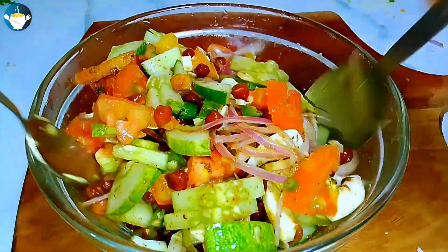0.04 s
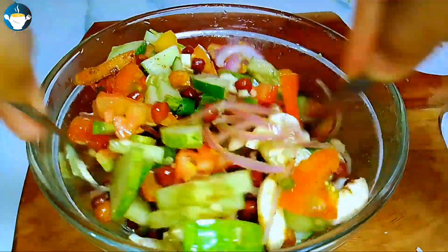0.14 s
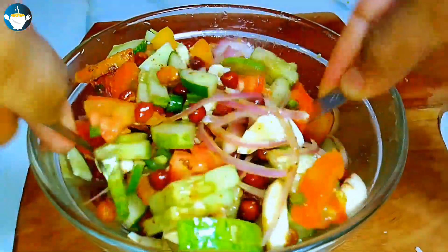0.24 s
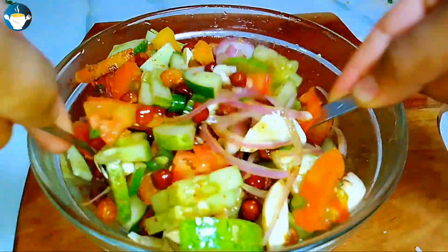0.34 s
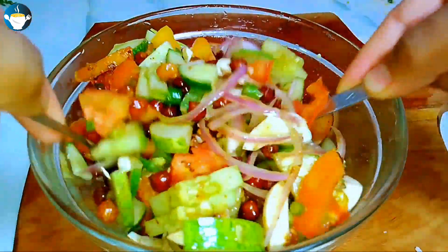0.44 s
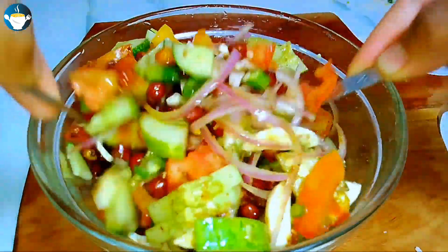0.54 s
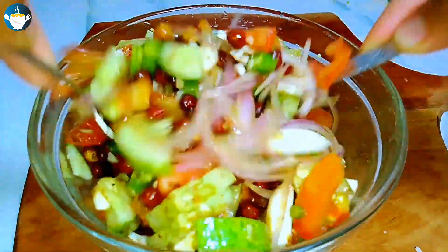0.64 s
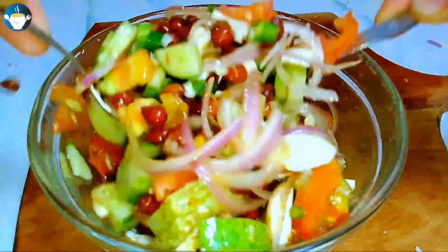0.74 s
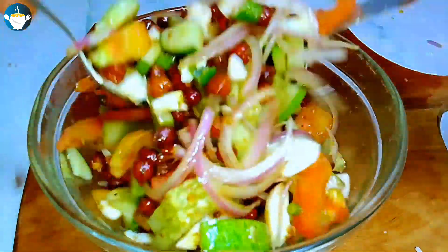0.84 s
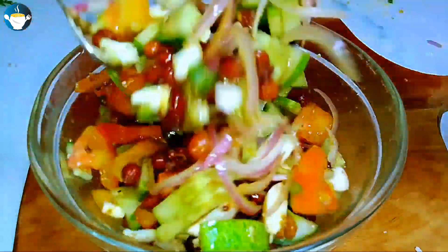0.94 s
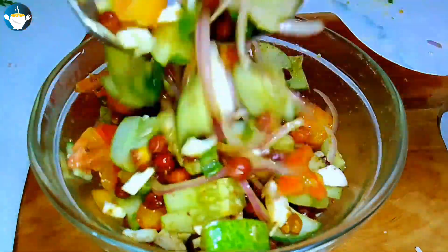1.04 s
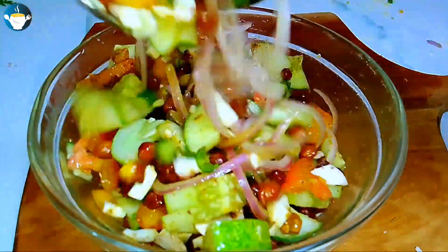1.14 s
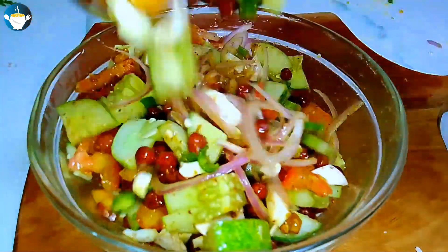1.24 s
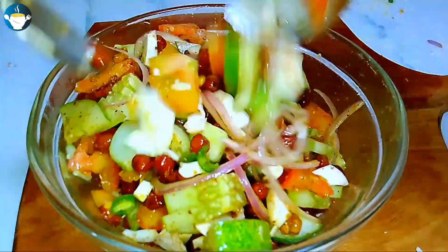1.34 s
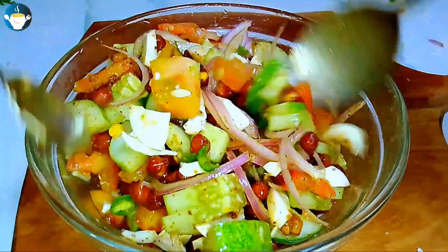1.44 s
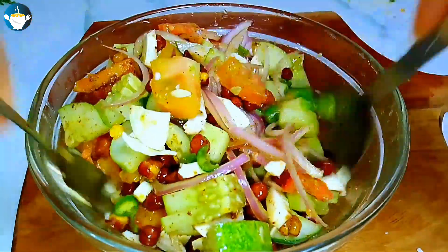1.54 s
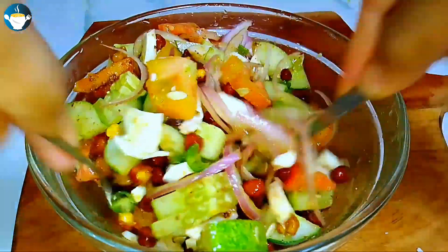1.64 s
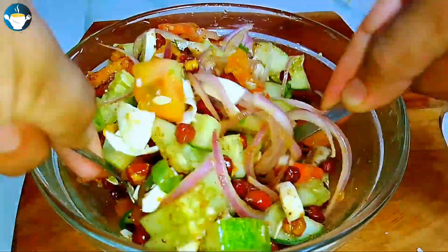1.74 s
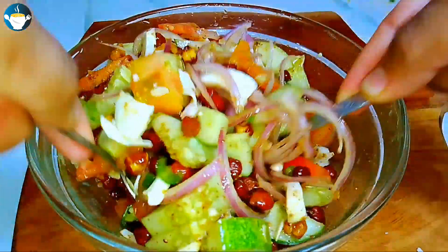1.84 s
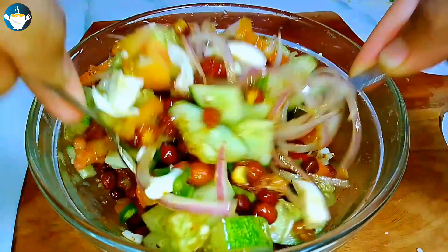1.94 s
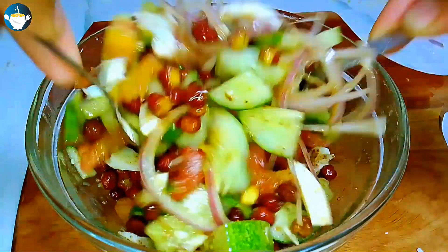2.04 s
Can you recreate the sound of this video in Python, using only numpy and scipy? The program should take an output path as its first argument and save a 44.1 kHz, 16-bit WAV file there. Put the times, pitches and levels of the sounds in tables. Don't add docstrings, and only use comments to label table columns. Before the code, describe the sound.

Metal spoons clink sharply twice against a food-filled glass bowl in a small hard kitchen.

```python
import sys
import numpy as np
from scipy import signal
from scipy.fft import rfft, irfft
from scipy.io import wavfile

SR = 44100
rng = np.random.default_rng(int(sys.argv[2]) if len(sys.argv) > 2 else 0)


def master(y):
    cut = np.clip(np.atleast_2d(y).T, -1, 1)
    pcm = np.round(cut * 32767)
    wavfile.write(sys.argv[1], SR, pcm.astype(np.int16))


def makeup_ratio(level_db):
    decades = np.asarray(level_db, float) / 20
    return 10 ** decades


N = 92610


def evened(x):
    return x / np.sqrt(np.mean(x ** 2) + 1e-20)


def read(points, hz):
    f, value = np.transpose(points)
    return np.interp(np.log(hz + 1), np.log(f + 1), value)


def add(mix, start_s, sound):
    part = mix[round(start_s * SR):][:len(sound)]
    part += sound[:len(part)]


def strikes(modes, times, colours_db, rise_s, sign=1):
    out, t = np.zeros(N), np.arange(SR // 2) / SR
    hz, db, t60 = np.transpose(modes)[:, :, None]
    rise = np.sin(np.pi / 2 * np.minimum(t / rise_s, 1))
    tones = rise * makeup_ratio(db - 60 * t / t60) * np.sin(2 * np.pi * hz * t)
    for start_s, colour_db in zip(times, colours_db):
        add(out, start_s, (sign * makeup_ratio(colour_db)) @ tones)
    return out


def tilted_strikes(modes, blows, rise_s):
    octaves = np.log2(np.transpose(modes)[0] / 2800)
    colours_db = [level_db + tilt_db * octaves for _, level_db, tilt_db in blows]
    return strikes(modes, [blow[0] for blow in blows], colours_db, rise_s)


# start_s, level_db
RUSTLE_LEVEL = [(0, -66), (.2, -62.5), (0.601, -58.5), (1.001, -62), (1.2, -60), (1.55, -67.5),
                (1.7, -66.5), (2.1, -60)]
RUSTLE_HZ, RUSTLE_SPREAD, GRAINS_PER_S, GRAIN_HALF_S = 3500, 0.0863, 1300, 0.0089


def rustle():
    t, out = np.arange(round(2 * GRAIN_HALF_S * SR)) / SR, np.zeros(N)
    grain_db = np.minimum(rng.exponential(1, N), 5)
    size = makeup_ratio(grain_db) * (rng.random(N) < GRAINS_PER_S / SR)
    kind = rng.integers(0, 24, N)
    for k, (offset, glide) in enumerate(rng.standard_normal((24, 2))):
        hz = RUSTLE_HZ * (1 + RUSTLE_SPREAD * offset + 1.5 * glide * t)
        grain = np.hanning(len(t)) * np.sin(2 * np.pi * hz * t)
        out += signal.oaconvolve(size * (kind == k), grain)[:N]
    level_db = np.interp(np.arange(N) / SR, *np.transpose(RUSTLE_LEVEL))
    return evened(out) * makeup_ratio(level_db)


# pitch_hz, level_db (per Hz)
HISS_COLOUR = [(20, -9.5), (35, -15), (110, -7.5), (170, -12), (400, -10), (1300, -13), (3500, -7.5),
               (7600, -34)]
HISS_DB = -58


def hiss():
    hz = np.fft.rfftfreq(N, 1 / SR)
    noise = irfft(rfft(rng.standard_normal(N)) * makeup_ratio(read(HISS_COLOUR, hz)), N)
    return makeup_ratio(HISS_DB) * evened(noise)


SPOON_HZ = [1300, 1560, 2121, 2390, 2640, 3220, 3545, 4030, 4215, 4400, 4597, 4748, 5250, 5580]
# level_db, t60_s
SPOON_RING = [(-14, 0.036), (-10, 0.035), (-10, 0.092), (-6, 0.03), (-8, .04), (-3, 0.043), (-4, 0.038),
              (-9, 0.036), (-17, 0.087), (-2.5, 0.018), (-8.5, 0.044), (-14.5, 0.099), (-16.5, 0.034),
              (-26.5, 0.06)]
# start_s, level_db, tilt_db (per octave)
SPOON_BLOWS = [
    (.2338, -40.5, -7.5),
    (0.24, -13, 4.5),
    (0.301, -36, 9),
    (1.7303, -30, 3),
    (1.7505, -18.5, 8.6),
]


def spoons():
    return tilted_strikes(np.column_stack([SPOON_HZ, SPOON_RING]), SPOON_BLOWS, rise_s=.0012)


# start_s, level_db, centre_hz
CRACKS = [
    (.2338, -31, 3500),
    (.2415, -23, 3380),
    (.299, -38, 5030),
    (.9668, -52.5, 1300),
    (1.1244, -35.5, 2090),
    (1.3495, -50.5, 1300),
    (1.511, -62.5, 4000),
    (1.7303, -33.5, 3680),
    (1.7507, -20.5, 3340),
]
CRACK_T60_S = 0.051


def cracks():
    out, t = np.zeros(N), np.arange(SR // 20) / SR
    noises = rng.standard_normal((len(CRACKS), len(t)))
    for (start_s, level_db, hz), noise in zip(CRACKS, noises):
        band = signal.butter(4, [.45 * hz, 1.6 * hz], "bandpass", fs=SR, output="sos")
        burst = signal.sosfilt(band, makeup_ratio(-60 * t / CRACK_T60_S) * noise)
        add(out, start_s, makeup_ratio(level_db) * burst * np.sqrt(SR / 2 / hz))
    return out


FAMILY_HZ = [900, 1800, 3100, 4870]
TOP_FROM_HZ, TOP_MODE_DB = 6000, -10.5


def glass(hz, sign, ring, clinks):
    hz = np.array(hz)
    top_db = TOP_MODE_DB * (hz > TOP_FROM_HZ)
    colours_db = [read(list(zip(FAMILY_HZ, clink[1:])), hz) + top_db for clink in clinks]
    times = [clink[0] for clink in clinks]
    return strikes(np.column_stack([hz, ring]), times, colours_db, rise_s=.0036, sign=np.array(sign))


HEAPED_HZ = [375, 690, 856, 895, 1000, 1798, 1797, 3122, 3130, 4872, 4906, 4850, 6837, 6845]
HEAPED_SIGN = [1, 1, 1, -1, 1, 1, 1, 1, 1, 1, -1, 1, 1, 1]
# level_db, t60_s
HEAPED_RING = [(-20, 0.18), (-3.5, 0.052), (4, .1), (1.5, .06), (4.5, .06), (7, 0.043), (-18.5, .5),
               (0.5, 0.03), (-42, 1), (-1.5, 0.071), (0, 0.079), (-19.5, 0.79), (-15, 0.21), (-1, 0.056)]
# start_s, then level_db at 900, 1800, 3100 and 4870 Hz up
FIRST_CLINKS = [
    (0.2339, -43, -42, -49, -16),
    (0.2417, -33, -25.5, 0, -28),
    (0.2734, -45.5, -36, -44, -41),
    (0.3, -47, -42, -52, -38),
]


def heaped_bowl():
    return glass(HEAPED_HZ, HEAPED_SIGN, HEAPED_RING, FIRST_CLINKS)


# delay_s, gain
ECHOES = [(.0058, -.15), (.0086, .3), (0.0139, .12), (.033, .12), (.046, -0.018), (.056, .07)]
# pitch_hz, t60_s
KITCHEN_DECAY = [(300, .45), (900, 1), (1800, 0.84), (3100, 0.64), (4900, 0.7), (7000, 0.57)]
ROOM_DB, ROOM_START_S, ROOM_BUILD_S = -9, .007, .018


def kitchen(x):
    near, taps = np.zeros(SR // 10), np.zeros(SR)
    near[0] = 1
    for delay_s, gain in ECHOES:
        near[round(delay_s * SR)] += gain
    at = np.arange(0, SR - 12, 12)
    taps[at + rng.integers(0, 12, len(at))] = rng.choice([-1., 1.], len(at))
    taps *= np.arange(SR) > ROOM_START_S * SR
    hz, t, z = signal.stft(taps, SR, nperseg=256)
    decay = makeup_ratio(-60 * t / read(KITCHEN_DECAY, hz)[:, None])
    tail = signal.istft(z * decay, SR, nperseg=256)[1]
    tail *= np.clip((np.arange(len(tail)) / SR - ROOM_START_S) / ROOM_BUILD_S, 0, 1)
    late = signal.fftconvolve(x, tail / np.linalg.norm(tail))[:N]
    return signal.fftconvolve(x, near)[:N] + makeup_ratio(ROOM_DB) * late


LIFTED_HZ = [720, 1798, 3125, 4875, 6837]
LIFTED_SIGN = [1, 1, 1, 1, 1]
# level_db, t60_s
LIFTED_RING = [(1, .05), (-0.5, .22), (2, .08), (2, .1), (2, 0.076)]
# start_s, then level_db at 900, 1800, 3100 and 4870 Hz up
LIGHT_CLINKS = [
    (0.9665, -50, -56.5, -45, -70.5),
    (1.3495, -61, -52, -69, -72),
    (1.511, -68.5, -61, -53.5, -63),
]


def lifted_bowl():
    return glass(LIFTED_HZ, LIFTED_SIGN, LIFTED_RING, LIGHT_CLINKS)


# pitch_hz, level_db, t60_s
BOARD_MODES = [(749, -6.5, 0.022), (940, -11, 0.026), (1208, -11, 0.073), (1693, -8.5, .025),
               (2142, -7.5, 0.057), (2645, 3, 0.017), (3127, -8, 0.032)]
# start_s, level_db, tilt_db (per octave)
DROPS = [
    (1.124, -27.5, 3.7),
    (1.128, -42, -3.5),
    (1.5585, -73, 11),
]


def drops():
    return tilted_strikes(BOARD_MODES, DROPS, rise_s=.002)


RETOSSED_HZ = [680, 870, 995, 1798, 1797, 3040, 3190, 3310, 4805, 4889, 4872, 6842, 6800]
RETOSSED_SIGN = [1, 1, 1, 1, 1, 1, 1, -1, -1, 1, 1, 1, -1]
# level_db, t60_s
RETOSSED_RING = [(2, 0.02), (-2.5, 0.1), (6, .05), (2, 0.018), (-34.5, 0.44), (-1, 0.022), (1, 0.027),
                 (-10.5, 0.041), (-2.5, 0.35), (-5.5, 0.16), (-14, 0.42), (-11.5, 0.15), (-1.5, 0.18)]
# start_s, then level_db at 900, 1800, 3100 and 4870 Hz up
LATE_CLINKS = [
    (1.7311, -42.5, -21, -26.5, -40),
    (1.7508, -37, -16.5, -6.5, -18),
    (1.7645, -35, -48, -42, -53),
]


def retossed_bowl():
    return glass(RETOSSED_HZ, RETOSSED_SIGN, RETOSSED_RING, LATE_CLINKS)


def scene():
    bowl = heaped_bowl() + lifted_bowl() + retossed_bowl()
    hits = spoons() + cracks() + bowl + drops()
    return (rustle() + hiss() + kitchen(hits))[None]


def low_pass(x):
    return signal.sosfilt(signal.butter(12, 15720, fs=SR, output="sos"), x)


EDGE_HZ, OVERLOAD, OFFSET = 6950, .71, .0009


def record(dry):
    lowpass = signal.ellip(8, .5, 70, EDGE_HZ, fs=SR, output="sos")
    band = signal.sosfilt(lowpass, dry)
    return low_pass(np.clip(band, -OVERLOAD, OVERLOAD) + OFFSET)


dry = scene()
out = record(dry)
master(out)
```